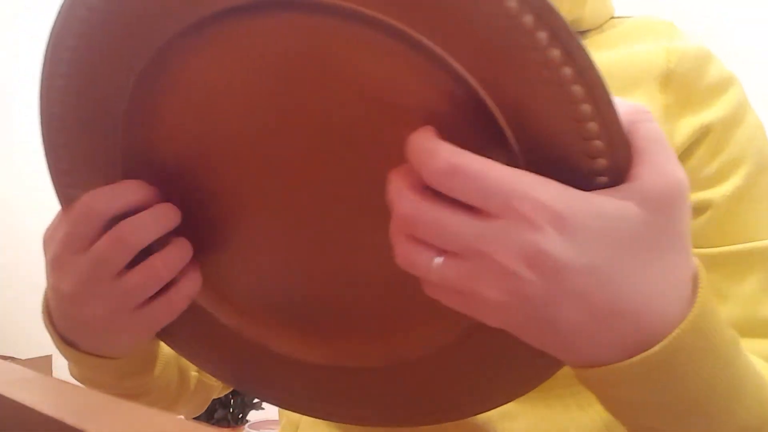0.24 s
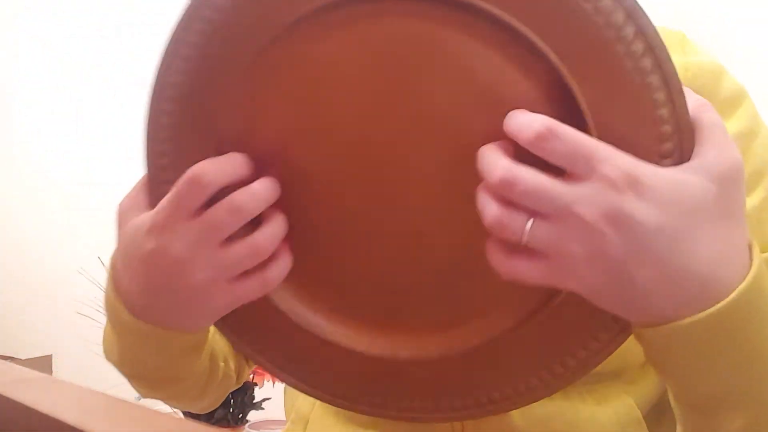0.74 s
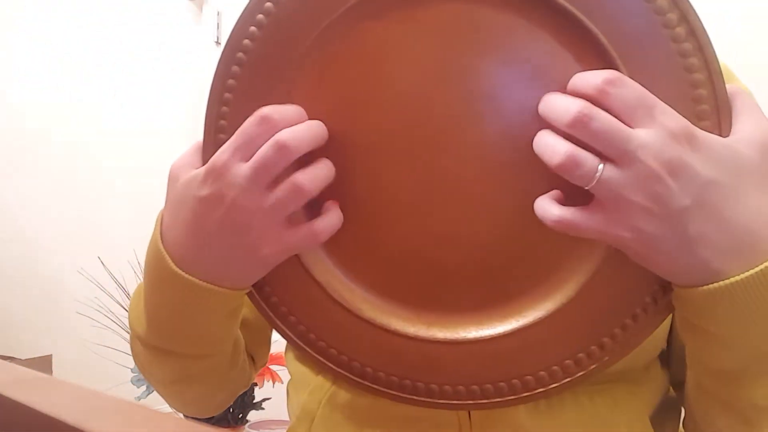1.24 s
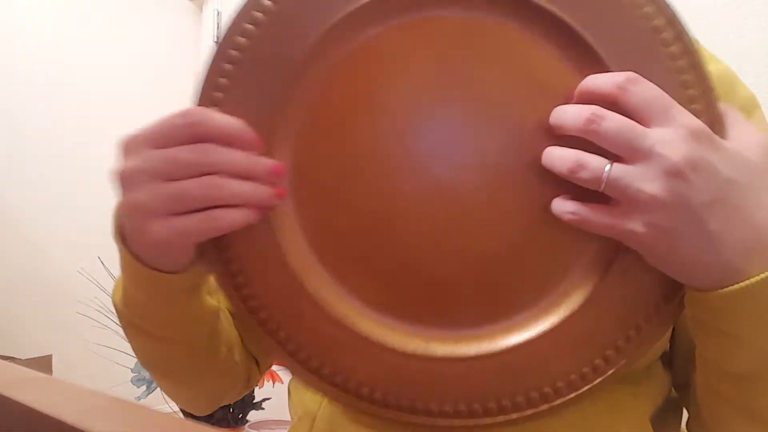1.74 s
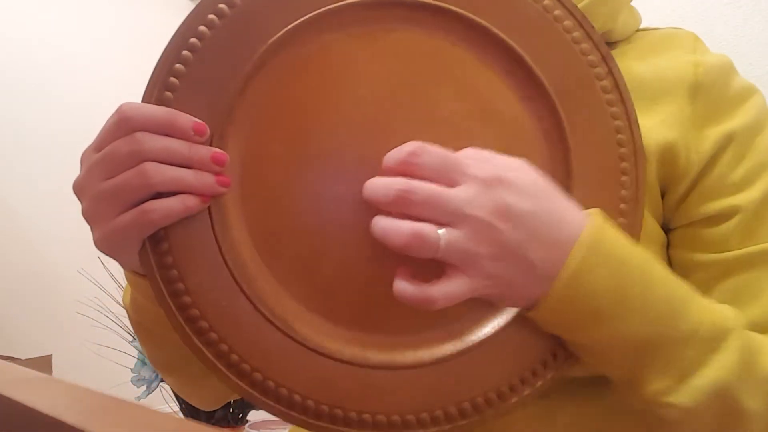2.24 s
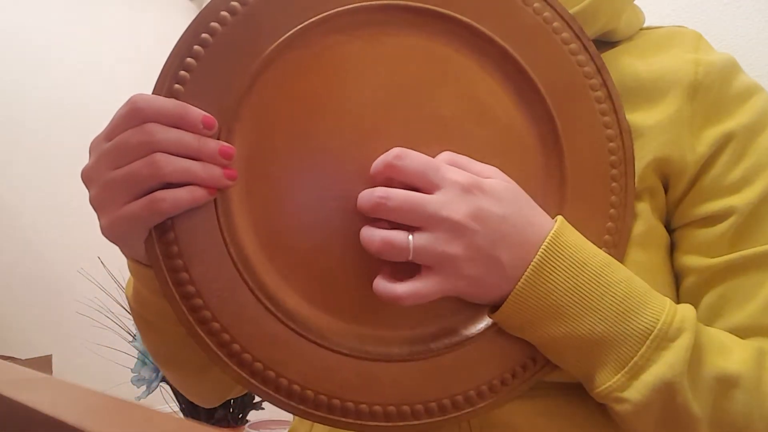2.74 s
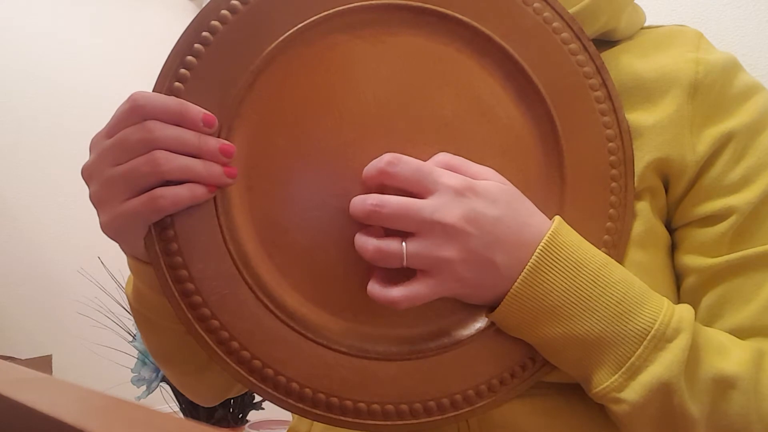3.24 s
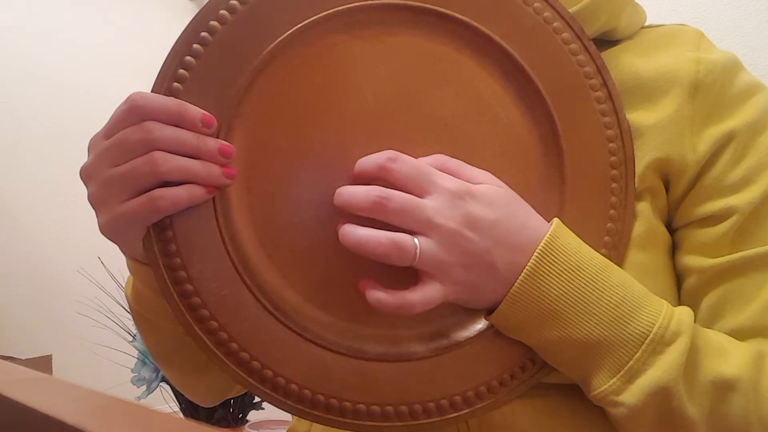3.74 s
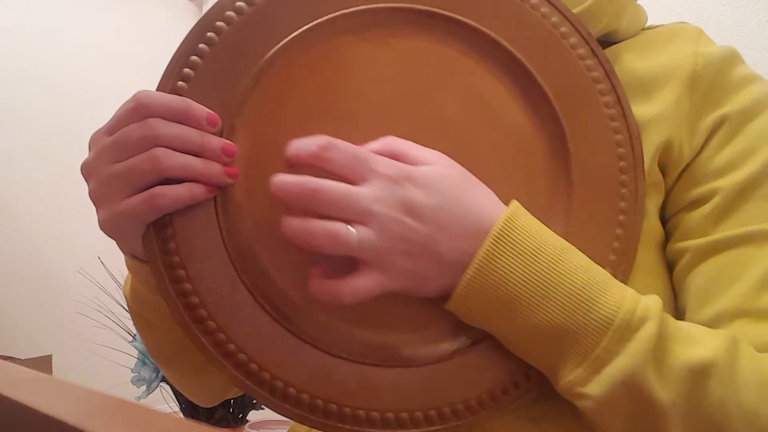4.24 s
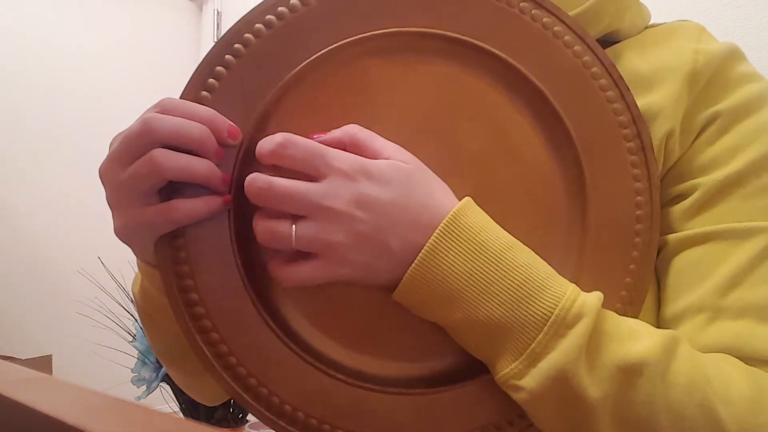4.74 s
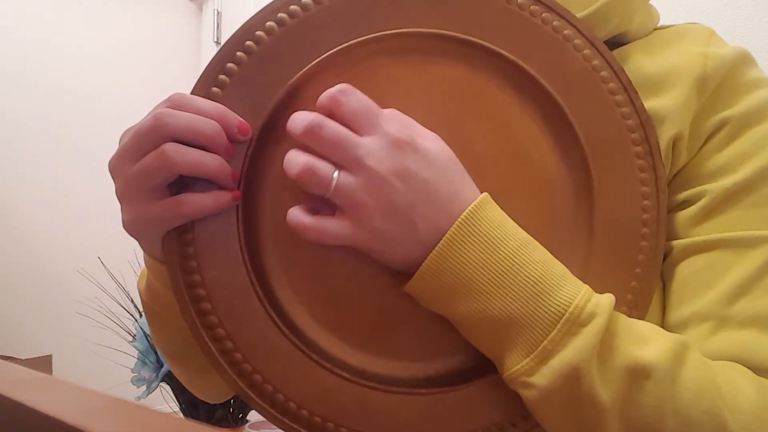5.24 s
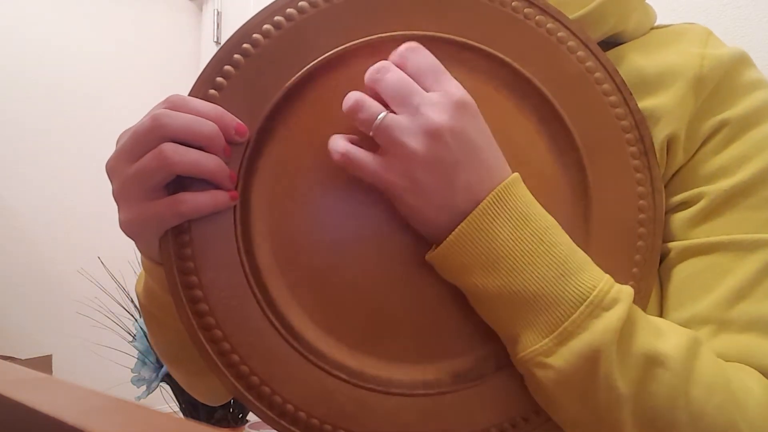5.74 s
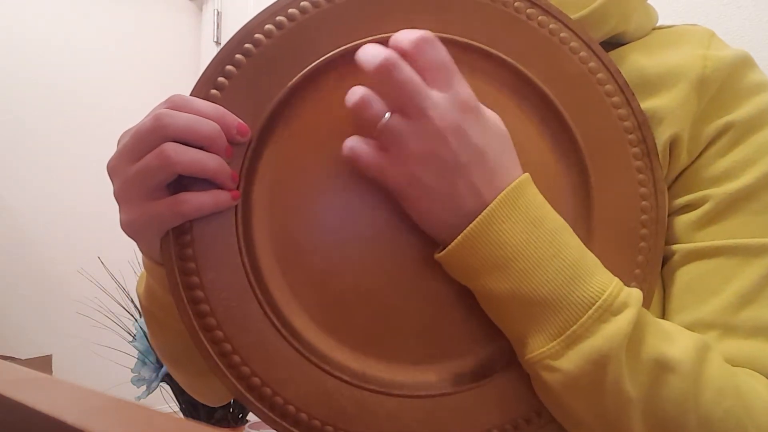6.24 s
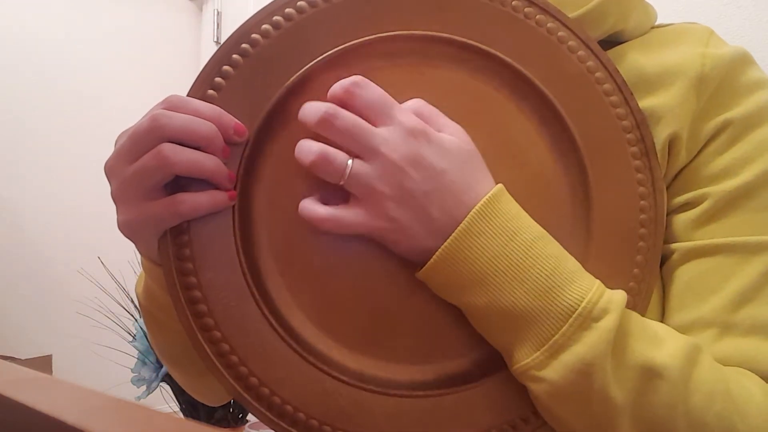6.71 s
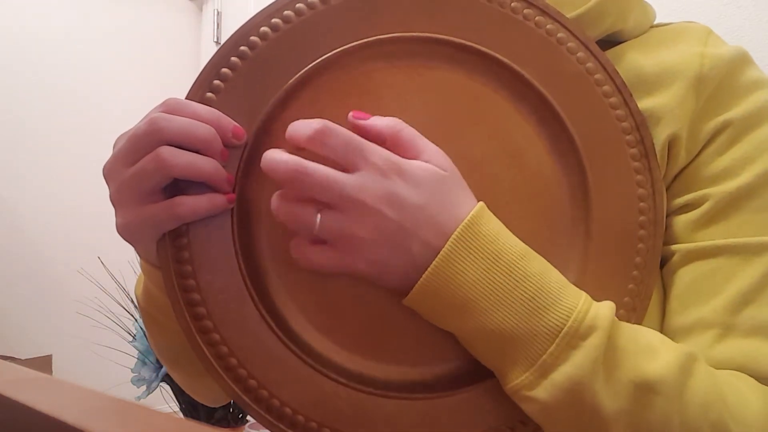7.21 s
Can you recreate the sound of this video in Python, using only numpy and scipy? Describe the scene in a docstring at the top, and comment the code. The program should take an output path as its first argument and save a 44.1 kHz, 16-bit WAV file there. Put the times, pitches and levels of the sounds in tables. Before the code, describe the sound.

A faint low hum and soft room noise run throughout, in a small quiet room, with the stereo microphone close. At 0 s the ring of a tap is dying as nails slide briefly over a hand-held glazed plate. From 0.1 to 1.7 s, nails of both hands drum quick overlapping rolls near the rim, about three a second: firm, hollow, damped knocks with tiny crisp clicks. Around 1.7 to 2.0 s nails slide with a thin, bright rasp and one catches. From 2.3 to 3.4 s one hand taps softer, sparser and rounder in the middle. It almost stops until about 4 s, with a soft fleshy touch and light scrapes at 4.1 to 4.6 s. From 4.5 s to the end near 7.5 s, taps off-centre gather into regular little rolls, light and clicky, growing somewhat firmer after 5.8 s, with faint scratches between. Each tap gets a short wall echo and brief tail.

```python
"""From the start a faint hum and low room noise lie under everything; the ring of a tap is dying away on
a glazed, hand-held plate, and nails slide over it: noise shaped by the plate's upper modes.
Fingernails of both hands then drum quick rolls near its rim: damped plate modes plus short nail clicks.
Near two seconds a sliding nail catches; then one hand taps softly in the middle and moves off-centre.
A stereo microphone is close; the small, quiet room answers each tap with a wall echo and a diffuse tail."""
import sys
import numpy as np
from scipy import signal
from scipy.fft import rfft, irfft, next_fast_len
from scipy.io import wavfile
from scipy.ndimage import map_coordinates

SR = 44100
rng = np.random.default_rng(int(sys.argv[2]) if len(sys.argv) > 2 else 0)


def master_out(mix):
    """Clip the mix to full scale and print it as 16-bit PCM to the path in sys.argv[1]."""
    frames = np.transpose(np.atleast_2d(mix))
    ceiling = np.clip(frames, -1, 1)
    pcm = np.round(ceiling * 32767).astype(np.int16)
    wavfile.write(sys.argv[1], SR, pcm)


N = 329427
TIME = np.arange(N) / SR  # s
SIZE = 8192  # samples in one tap's response
HZ = np.fft.rfftfreq(SIZE, 1 / SR)


def amp(db):
    """Decibel law: the amplitude gain for a level in dB."""
    return 10 ** (np.asarray(db) / 20)


def unit(x):
    """Normalisation: scale to rms 1."""
    return x / np.sqrt(np.mean(x ** 2) + 1e-20)


def along(points, hz):
    """Logarithmic frequency scale: interpolate (Hz, value) points at hz."""
    point_hz, value = np.transpose(points)
    return np.interp(np.log(hz + 1), np.log(point_hz + 1), value)


def wobble(rate):
    """Slow random modulation: a smooth curve through rate random knots a second."""
    knots = rng.standard_normal(int(N * rate / SR) + 4)
    return map_coordinates(knots, [TIME * rate])


def swell(s, length):
    """Gaussian envelope: a bell-shaped rise and fall, centred on s."""
    return np.exp(-(2 * (TIME - s) / length) ** 2)


def filtered(x, response):
    """Linear filtering: multiply the spectrum of x by a response of frequency."""
    n = x.shape[-1]
    padded = next_fast_len(n + SIZE)
    spectrum = rfft(x, padded) * response(np.fft.rfftfreq(padded, 1 / SR))
    return irfft(spectrum, padded)[..., :n]


def causal(gain):
    """Minimum phase: the spectrum of least delay with this gain on the HZ grid, by folding the cepstrum."""
    cepstrum = irfft(np.log(gain + 1e-6))
    cepstrum[1:SIZE // 2] *= 2
    cepstrum[SIZE // 2 + 1:] = 0
    return np.exp(rfft(cepstrum))


def resonances(hz, centre, width, level_db):
    """Modal superposition: the gain of damped resonances whose powers add."""
    f = hz[:, None] + 1e-3
    shapes = 1 / (1 + ((f ** 2 - centre ** 2) / (f * width)) ** 2)
    return np.sqrt(shapes @ amp(level_db) ** 2)


def band(hz, low_hz, high_hz, order=6):
    """Band-pass filtering: gain that falls steeply outside two corner frequencies."""
    return 1 / (1 + (low_hz / (hz + 1)) ** order) / (1 + (hz / high_hz) ** order)


def add(track, s, sound):
    """Superposition: mix a sound into the track at s seconds."""
    part = track[:, max(round(s * SR), 0):][:, :sound.shape[-1]]
    part += sound[:, :part.shape[-1]]


# Likeness of diffuse sound at the two microphones.
# Each row: frequency in Hz, correlation from -1 to 1.
COHERENCE = [(100, 0.67), (500, 0.85), (1000, 0), (1800, 0.075), (15000, 0)]


def diffuse(gain, size=N):
    """Diffuse-field coherence: coloured stereo noise of rms 1, most alike in the bass."""
    def mid_side_gain(hz):
        angle = np.arccos(np.clip(along(COHERENCE, hz), -1, 1)) / 2
        return gain(hz) * np.array([np.cos(angle), np.sin(angle)])

    mid, side = filtered(rng.standard_normal((2, size)), mid_side_gain)
    return unit(np.array([mid + side, mid - side]))


# Spectrum of the room noise, before its overall level.
# Each row: frequency in Hz, relative density in dB per Hz.
ROOM_NOISE = [(25, -29), (60, 5.5), (120, -3), (200, -2.5), (260, -8), (298, 3.5), (350, -9), (490, -9),
              (800, -9.5), (2000, -24), (5000, -23.5), (10000, -28.5), (15800, -20.5)]
HUM_HZ = 296


def background():
    """Stationary noise and a tone: quiet room noise with a faint hum unsteady in level and phase."""
    floor = amp(-69.5) * diffuse(lambda hz: amp(along(ROOM_NOISE, hz)))
    hum_level = amp(-75 + 1.6 * wobble(7.6)) * np.sqrt(2)  # a sine's peak is root two times its rms
    hum = hum_level * np.sin(2 * np.pi * HUM_HZ * TIME + 0.39 * wobble(20))
    return floor + hum


# Clusters of dense upper plate modes, sounded by nail clicks and slides.
# Each row: centre in Hz, width in Hz, relative level in dB.
UPPER_MODES = [(1190, 510, 7), (1950, 1200, 5.5), (2720, 570, -4.5), (4190, 1000, 1.5), (5000, 2200, -3),
               (6720, 1800, 0.5), (8260, 610, 2.5), (13800, 1700, -17)]


def upper(hz, scatter_db=0):
    """High modal density: crowded upper modes act as a few broad resonances."""
    centre, width, level_db = np.transpose(UPPER_MODES)
    return resonances(hz, centre, width, level_db + scatter_db * rng.standard_normal(len(centre)))


# Plate modes, damped by the grip. Each row: nominal frequency in Hz, width in Hz,
# mean level in dB struck near the rim, level in dB in the middle, level in dB off-centre.
PLATE_MODES = [(68.5, 17.2, -8, -9.5, -11), (137, 60, -14.5, -20, -14), (187, 29, -6.5, -31, -27),
               (216, 15.8, -28, -2.5, -5), (302, 16.6, -18, 1.5, -4.5), (372, 34, -15, -5.5, -7.5),
               (440, 17, -36, 0, -40), (490.5, 22.2, 0.5, -3.5, -8.5), (539.3, 39, -5.5, -5, -0.5),
               (609.5, 12.6, -3.5, -3, -4), (740, 66, -44, -36, -19), (824, 28, -27, -12.5, -15.5),
               (907, 11.3, -14, -38, -11), (1117, 44, -30, -16, -16), (1259, 58, -23.5, -16.5, -19),
               (1463, 71, -23, -23.5, -14), (1732, 33, -14.5, -21, -18.5), (1915, 95, -67, -29, -19),
               (2110, 210, -28, -69, -53), (3100, 250, -32, -78, -40)]


def plate(hz, place, scatter_db=0, detune=0):
    """Modal excitation: the place weights each mode; touches vary, more so for higher modes."""
    centre, width, *levels = np.transpose(PLATE_MODES)
    weight, shift = rng.standard_normal((2, len(centre))) * np.sqrt(centre / 1000)
    return resonances(hz, centre * np.exp(detune * shift), width, levels[place] + scatter_db * weight)


# each nail skids on after landing: rasp re the blow (dB), brightness (dB), decay time (s)
SKID_DB, SKID_BRIGHT_DB, SKID_T60_S = -82.5, -7, 0.64
REST_DB = -78.5  # faint rasp of fingers resting on the plate


def skids():
    """Frictional decay: rubbing strength as the nails settle after each tap, and at rest."""
    power = np.full((1, N), amp(REST_DB) ** 2)
    fade_db = -60 * np.arange(SR) / SR / SKID_T60_S
    for s, blow_db, _ in FINGER_TAPS:
        add(power, s, amp(SKID_DB + blow_db + fade_db[None]) ** 2)
    return np.sqrt(power[0])


# Strokes of the nails over the glaze.
# Each row: centre in seconds, length in seconds, peak rasp in dB, brightness in dB.
NAIL_STROKES = [(0.01, 0.21, -64.5, -5.5), (0.255, 0.082, -62, -1), (0.678, 0.31, -74, -6),
                (0.853, 0.24, -65.5, -3), (1.74, 0.13, -65, 0), (1.926, 0.22, -67, 2.5),
                (3.52, 0.092, -76, 1), (4.147, 0.25, -66.5, -2.5), (4.287, 0.2, -72, 5),
                (4.44, 0.2, -70.5, 2.5), (4.583, 0.14, -67.5, -2), (4.987, 0.11, -66, 0.5),
                (5.184, 0.36, -75.5, 0), (5.563, 0.18, -71, 1), (5.68, 0.14, -64.5, 0.5),
                (5.834, 0.15, -67.5, 3.5), (5.98, 0.32, -73, -6), (7.333, 0.22, -69.5, -8),
                (7.453, 0.18, -65.5, -4.5)]
# Low murmurs of the plate: the ring of a tap already dying away at the start, then two fingertip drags.
# Each row: centre in seconds, length in seconds, peak level in dB.
PLATE_MURMURS = [(0.005, 0.039, -46), (1.765, 0.13, -58), (1.996, 0.089, -60)]
HISS_PER_BRIGHT = 1.7  # a bright stroke lifts the fine hiss more than the scrape (dB per dB)
MURMUR_DB = -2.5  # the plate's murmur under any stroke, re its rasp


def sliding():
    """Frictional excitation: nails rub the upper modes over the grain; the lower plate modes murmur."""
    moves = [(amp(db) * swell(s, length), bright_db) for s, length, db, bright_db in NAIL_STROKES]
    moves.append((skids(), SKID_BRIGHT_DB))

    def strength(per_bright):
        return np.sqrt(sum((gain * amp(per_bright * bright_db)) ** 2 for gain, bright_db in moves))

    def rub(low_hz, high_hz):
        return diffuse(lambda hz: upper(hz) * band(hz, low_hz, high_hz))

    grain_db = 1.3 * wobble(28) + 1.6 * wobble(500)
    rubbing = strength(0)
    rasp = rubbing * rub(low_hz=970, high_hz=3800)
    scrape = amp(-2.5) * strength(1) * rub(low_hz=3260, high_hz=10000)
    hiss = amp(-8.5) * strength(HISS_PER_BRIGHT) * rub(low_hz=11000, high_hz=17000)
    murmur_level = amp(MURMUR_DB) * rubbing
    murmur_level = murmur_level + sum(amp(db) * swell(s, length) for s, length, db in PLATE_MURMURS)
    murmur = murmur_level * diffuse(lambda hz: plate(hz, place=0) * band(hz, 200, 1400, order=3))
    return amp(grain_db) * (rasp + scrape + hiss) + murmur


# Where the fingers play: rim, middle, off-centre. Each row: start in seconds,
# delay of the knock at the left microphone in ms, nail click and fingertip thud in dB
# before the effects of blow and hardness, the nail's own mean ring in dB.
PLAYING_PLACES = [(0, 0.11, -41.5, 5.9, 4.5), (2.2, 0.047, -44.5, 1.9, 12), (4.3, .17, -39.5, 5.5, -2)]


def place_at(s):
    """Source position: which of the places the fingers play at s."""
    return max(sum(s >= start for start, *_ in PLAYING_PLACES) - 1, 0)


def knock(s, thud_db, hard_db, spread_s, damp_s, ring_share):
    """Impulse excitation: in a short push flesh adds bass and a hard nail reaches the upper modes."""
    place = place_at(s)
    contact = [(20, thud_db - 19), (50, thud_db), (130, thud_db), (260, 0.049),
               (520, 0.09 * hard_db), (800, 0.46 * hard_db), (1300, hard_db),
               (2000, hard_db), (5000, hard_db - 28)]  # (Hz, dB)
    modes = plate(HZ, place, scatter_db=2.0, detune=0.017)
    spectrum = causal(modes * amp(along(contact, HZ)))
    # bending waves bounce around the rim, so the higher modes arrive a little scattered in time
    scatter = np.abs(map_coordinates(rng.standard_normal(SIZE), [HZ / 400], order=1))
    delay_s = spread_s * scatter * band(HZ, 837, 20000)
    lag_s = PLAYING_PLACES[place][1] / 1000
    cycles = np.cumsum(delay_s) * HZ[1] + HZ * np.array([[lag_s], [0]])  # left, right
    ring = -irfft(spectrum * np.exp(-2j * np.pi * cycles))
    # the fingertip settles on the plate and chokes part of the ring
    choke = np.exp(-(np.arange(SIZE) / SR / damp_s) ** 2)
    return ring * (ring_share + (1 - ring_share) * choke)


def click(click_db, t60, bright_db, nail_hz, nail_db):
    """Hard contact: the nail's edge rings upper modes and a pitch of its own; stronger is brighter."""
    burst = rng.standard_normal((2, SIZE)) * amp(-60 * np.arange(SIZE) / SR / t60)
    slope_db = np.minimum(bright_db * (click_db + 21.5), 0)  # nears this per octave in the treble
    nail_pitch = nail_hz * np.exp(0.072 * rng.standard_normal(1))
    nail = resonances(HZ, nail_pitch, 330, nail_db + 2 * rng.standard_normal(1))
    colour = np.hypot(upper(HZ, scatter_db=2.5), nail) * band(HZ, 1350, 22000)
    colour = colour * amp(slope_db * np.log2(1 + HZ / 3000))
    return amp(click_db) * unit(irfft(rfft(burst) * causal(colour))) / np.sqrt(SIZE)


# Decay time of the room. Each row: frequency in Hz, time to fall by 60 dB in seconds.
ROOM_DECAY = [(100, 0.39), (260, 0.24), (600, 0.25), (1800, 0.17), (5000, 0.32), (14000, 0.23)]
# Colour of the room's tail. Each row: frequency in Hz, gain in dB.
TAIL_COLOUR = [(100, -6.5), (500, -7), (900, 0), (1800, -5), (4000, -6), (14000, -6.5)]


def room(wall_db, wall_s, build_s):
    """Reverberation: a near wall's echo and a tail that dies at its own speed in each band."""
    hz, t, bins = signal.stft(diffuse(np.ones_like, size=2 * SIZE), SR, nperseg=256)
    decay = amp(-60 * t / along(ROOM_DECAY, hz)[:, None])
    tail = signal.istft(bins * decay, SR, nperseg=256)[1]
    tail *= 1 - np.exp(-(np.arange(tail.shape[1]) / SR / build_s) ** 2)  # gradual build-up
    tail = filtered(tail / np.linalg.norm(tail[0]), lambda hz: amp(along(TAIL_COLOUR, hz)))
    bump = signal.windows.hann(21)
    wall = amp(wall_db) * np.array([bump, bump]) / bump.sum()
    add(tail, wall_s * rng.uniform(0.904, 1.15), wall)
    return tail


# Taps, in rolls about three times a second. Each row: start in seconds, relative blow in dB,
# hardness in dB (high for nail, low for flesh).
FINGER_TAPS = [(0.129, 18.5, 3), (0.1948, 18, 0.5), (0.2308, 20.5, 0), (0.2323, 20, -3.5), (0.2815, 3.5, 9),
               (0.3117, 15, -1), (0.402, 3.5, 0.5), (0.4765, 16, 0), (0.4861, 19, -3.5), (0.5021, 15.5, -3),
               (0.583, 13.5, -1), (0.7608, 18.5, 1.5), (0.768, 18, 0.5), (0.7972, 15.5, -3),
               (0.8744, 10.5, -3), (1.009, 14, -4.5), (1.062, 17.5, 0.5), (1.0673, 18.5, 1),
               (1.0806, 17.5, -4), (1.092, 18.5, -2), (1.1351, 12, 6), (1.1889, 10.5, 0.5),
               (1.302, 10.5, -2.5), (1.3706, 19.5, 0.5), (1.382, 12.5, 3.5), (1.3982, 18.5, -1),
               (1.446, 17.5, -1), (1.4574, 12, 0), (1.4789, 13.5, 1.5), (1.5742, 16.5, -2),
               (1.6028, 10.5, -5), (1.612, 6.5, 1), (1.6672, 6.5, 4.5), (1.6794, 10, -2), (2.328, -4, -5.5),
               (2.694, 10, -9), (2.7837, 13, -5.5), (2.8397, 8.5, -2), (3.0468, 11, -5.5),
               (3.1291, 8.5, -5), (3.2705, 3.5, 0), (3.3733, 3, 7), (3.732, -16.5, -2), (3.883, -11, -32),
               (4.0038, 3.5, -27), (4.5442, -5, 5), (4.613, 1.5, -7), (4.712, 9, -3), (4.7577, 0.5, 6.5),
               (4.8179, 1.5, 2.5), (4.9982, 6.5, 0), (5.0556, 6, 2), (5.0992, 4.5, 4), (5.169, 5.5, 7.5),
               (5.312, 9, -1), (5.3805, 8, 1.5), (5.4121, 11, 3), (5.4688, 7.5, 5), (5.6778, 6, -1.5),
               (5.7683, 0, -2.5), (5.8508, 14, 1.5), (5.8648, 8, 2.5), (6.0376, 10.5, -4), (6.141, 7, -1),
               (6.196, 9.5, 2), (6.2293, 13.5, -2), (6.4205, 12.5, -8.5), (6.494, 11, -2.5),
               (6.538, 9, -1.5), (6.6147, 11.5, 2), (6.766, 14.5, -6.5), (6.8445, 8.5, -3), (6.898, 8.5, 3),
               (6.9387, 14.5, 2), (7.1036, 8.5, -1), (7.148, 11.5, -2.5), (7.1667, 9, 2.5),
               (7.2023, 13, 2.5), (7.4367, 9, 0.5), (7.4604, 9.5, 2)]
CLICK_PER_BLOW, CLICK_PER_HARD = 0.76, 0.49  # the click grows with blow and hardness (dB per dB)
THUD_PER_BLOW = 0.57  # the thud recedes behind the knock as the blow grows (dB per dB)
# below this hardness (dB) only flesh lands, and the thud grows (dB per dB)
FLESH_DB, THUD_PER_SOFT = -8.5, 0.75


def taps():
    """Impact and room response: force and hardness set each knock and click, and the room answers."""
    track = np.zeros((2, N))
    for s, blow_db, hard_db in FINGER_TAPS:
        *_, place_click_db, place_thud_db, nail_db = PLAYING_PLACES[place_at(s)]
        softness_db = max(FLESH_DB - hard_db, 0)
        thud_db = place_thud_db - THUD_PER_BLOW * blow_db + THUD_PER_SOFT * softness_db
        click_db = place_click_db + CLICK_PER_BLOW * blow_db + CLICK_PER_HARD * hard_db
        tap = amp(blow_db + 0.5) * knock(s, thud_db, hard_db, spread_s=0.00116, damp_s=0.02, ring_share=0.25)
        tap += amp(2.0) * click(click_db, t60=0.025, bright_db=0.69, nail_hz=4340, nail_db=nail_db)
        tap = tap[:, :SIZE // 2]  # the ring is mostly gone by 93 ms
        add(track, s, tap)
        answer = room(wall_db=-16.0, wall_s=0.0096, build_s=0.0027)
        add(track, s, signal.fftconvolve(tap, answer, axes=1))
    return track


# A nail catching on the glaze.
# Each row: centre in seconds, length in seconds, resonance in Hz, mean peak level in dB.
NAIL_CATCHES = [(1.94, 0.2, 2870, -68), (4.577, 0.034, 2540, -62.5)]


def catches():
    """Stick-slip friction: a sliding nail sticks and slips, heard as noise around one resonance."""
    track = np.zeros((2, N))
    for s, length, centre_hz, db in NAIL_CATCHES:
        rasp = diffuse(lambda hz: resonances(hz, centre_hz, 570, [0]) ** 2)
        track += amp(db + 1.1 * wobble(150)) * swell(s, length) * rasp
    return track


# Sensitivity of the microphone pair. Each row: frequency in Hz, left minus right in dB.
MICROPHONE_TILT = [(60, -6), (92, 1), (140, 2.5), (210, 3.0), (330, 4), (500, 0.5), (770, 7), (1170, -5),
                   (1790, -3), (2740, -0.5), (4190, 0.5), (6410, -3), (9810, -4), (15000, 2)]


def microphones(sound):
    """Transducer response: each microphone's own colour, half the difference on either side."""
    return filtered(sound, lambda hz: amp(along(MICROPHONE_TILT, hz) * np.array([[.5], [-.5]])))


def scene():
    """Superposition: the plate, coloured by the microphones, over the room's floor."""
    fingers = taps() + sliding() + catches()
    return microphones(fingers) + background()


def record(dry):
    """Band limiting: nothing from 16 kHz up passes."""
    return filtered(dry, lambda hz: hz < 16000)


dry = scene()
out = record(dry)
master_out(out)
```